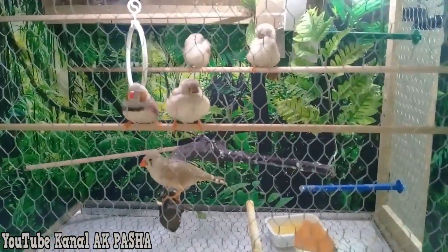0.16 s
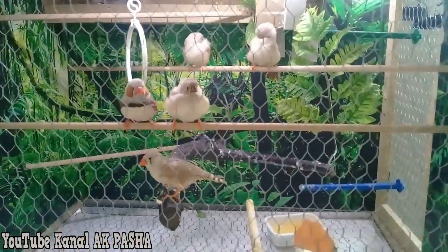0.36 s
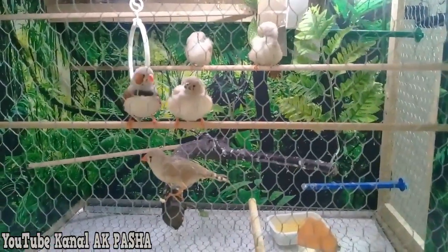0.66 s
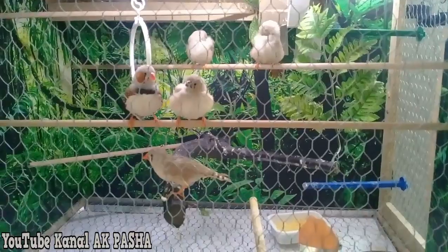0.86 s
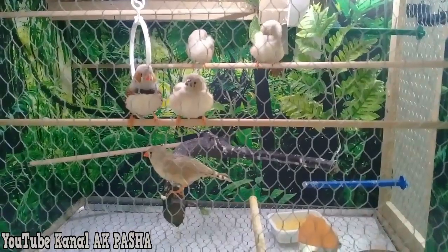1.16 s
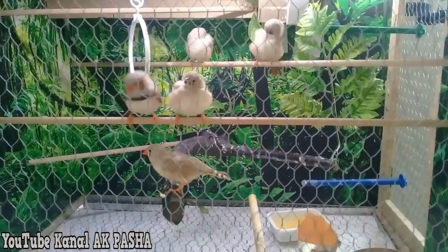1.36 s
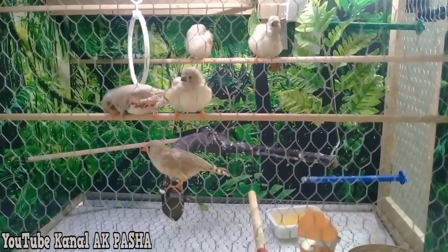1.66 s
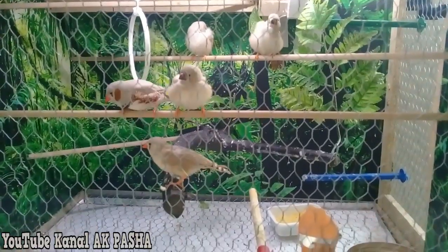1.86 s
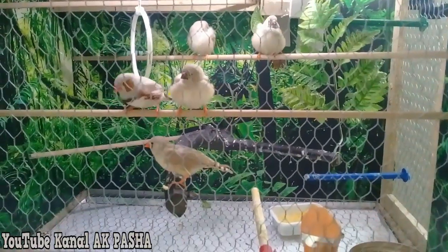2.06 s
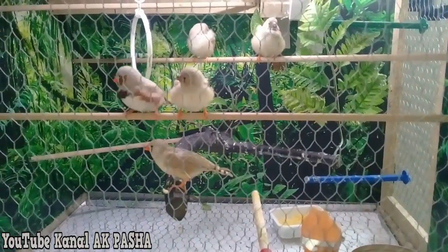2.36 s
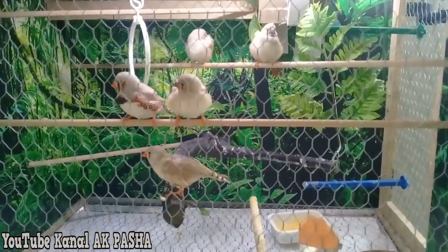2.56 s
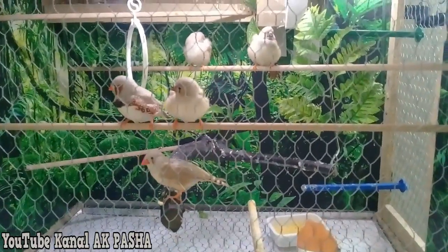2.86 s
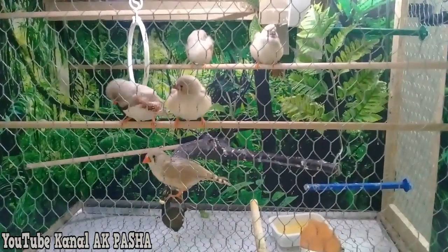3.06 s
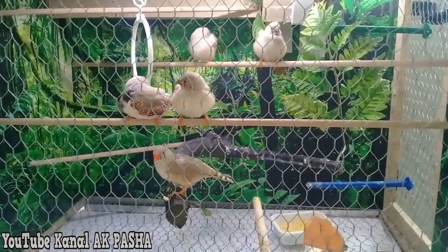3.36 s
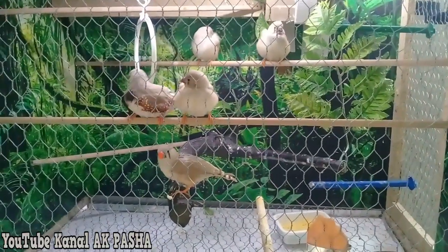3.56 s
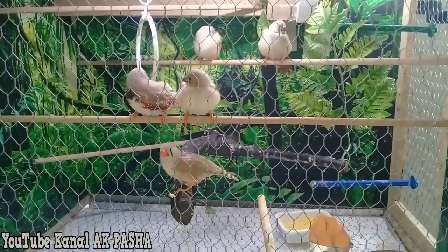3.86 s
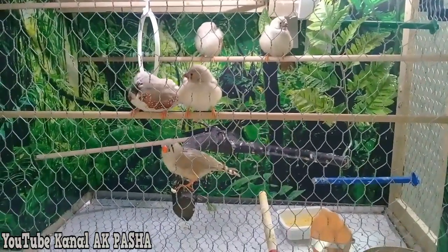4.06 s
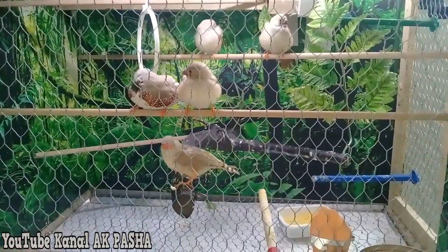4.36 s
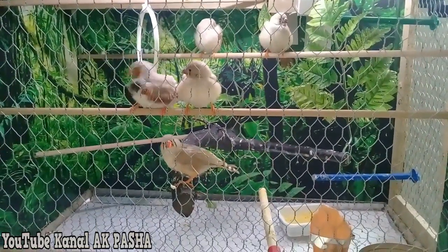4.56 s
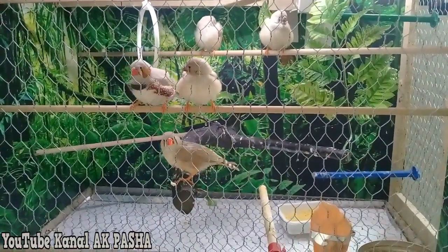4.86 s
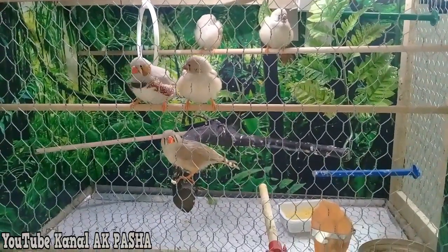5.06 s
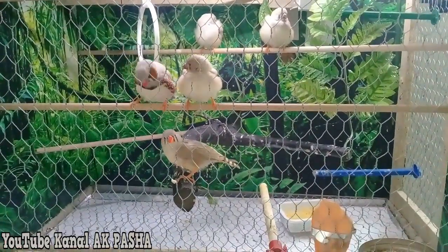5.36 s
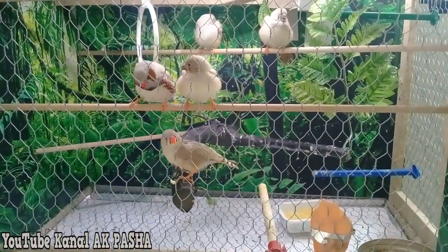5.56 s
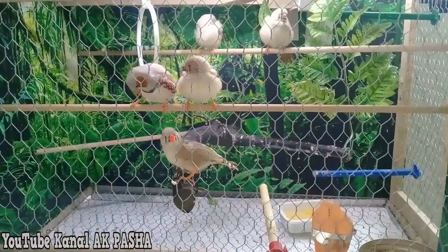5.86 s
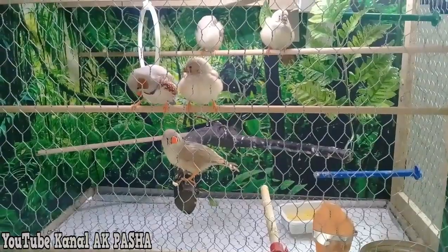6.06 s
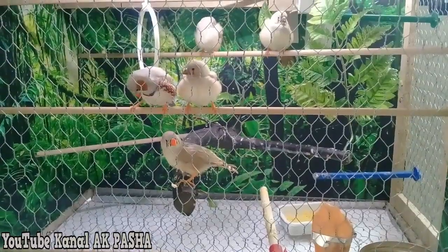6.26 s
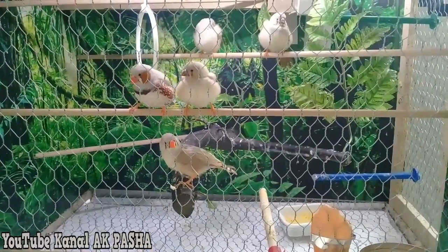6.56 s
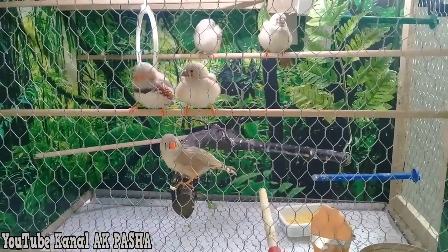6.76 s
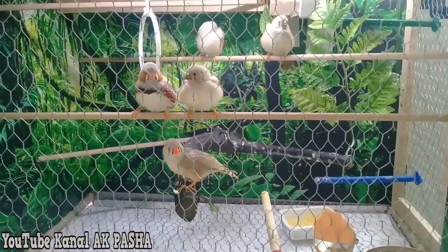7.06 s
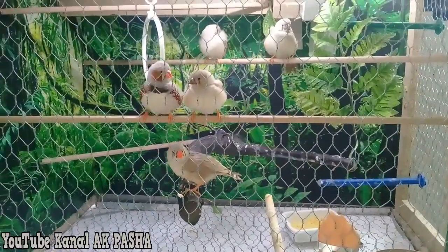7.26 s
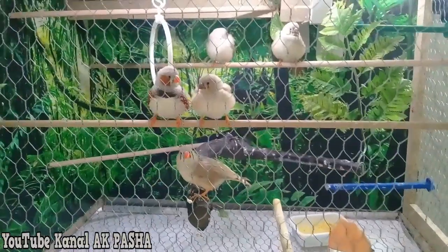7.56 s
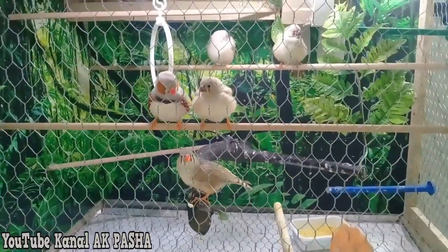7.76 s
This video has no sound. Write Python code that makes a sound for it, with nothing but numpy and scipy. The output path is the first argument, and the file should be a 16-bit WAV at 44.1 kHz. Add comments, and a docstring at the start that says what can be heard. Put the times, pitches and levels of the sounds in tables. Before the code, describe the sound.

Small finches call in a wire cage inside a room, heard a metre or two away on a phone, over quiet low rumble, hum and hiss. At 0 s a tiny whistle and two bright nasal beeps sound with a soft bump, then rough squawks and hoarse calls until 0.7 s. A mellow nasal toot comes at 1.1 s. From 1.5 to 3.1 s quick, broken, mostly falling whistles tumble together with harsh, bright squawks, loudest around 2.4 to 2.7 s. More squawks, a nasal beep and two whistles follow at 3.4 to 3.9 s. Hard dry ticks on perch or wire stand out at 3.6, 4.0 and 4.3 s; lighter ones continue. Between 4 and 5.8 s a young bird whines in thin slides. After a sparse ticking stretch, nasal beeps and chattering whistles return from 6.8 s, with a mellow call at 7.4 s and a faint high whistle ending.

```python
"""Small finches in a wire cage in a room, a metre or two from a phone: low rumble, hum and hiss throughout.
A breathy treble haze (grainy noise band), stepped whistles (near sines) and bright nasal calls (overtone
stacks) open; a soft bump, harsh squawks, hoarse calls (smeared stacks) and mellow nasal calls follow.
From 1.7 s beaks and feet tick on perch and wire (noise-struck modes); from 4 s a young bird whines
(sliding overtones). Whistles and calls return, a thin high whistle ends; the room rings briefly."""
import sys
import numpy as np
from scipy import signal
from scipy.fft import rfft, irfft
from scipy.io import wavfile
from scipy.ndimage import uniform_filter1d

SR = 44100
rng = np.random.default_rng(int(sys.argv[2]) if len(sys.argv) > 2 else 0)


def unload_audio(sound):
    """Save the sound as a 16-bit wav file, at the path given as the first command line argument."""
    columns = np.transpose(np.atleast_2d(sound))
    # keep every value between -1 and 1, then stretch to whole-number steps
    steps = np.round(np.clip(columns, -1, 1) * 32767)
    wavfile.write(sys.argv[1], SR, steps.astype(np.int16))


def voltage_ratio(level):
    """Linear amplitude factor for a level in decibels (scalar or array-like)."""
    return 10 ** (np.asarray(level, float) / 20)


N = 349272
TOP_HZ = 15800


def level(x, rms_db):
    """Scale to an rms level."""
    return x * voltage_ratio(rms_db) / np.sqrt(np.mean(x ** 2))


def shape(points, hz):
    """Spectrum in dB at hz, interpolated on log frequency."""
    point_hz, point_db = np.transpose(points)
    return np.interp(np.log(hz), np.log(point_hz), point_db)


def band(x, hz, width_hz):
    """Resonance, gain 1 at the centre."""
    return signal.lfilter(*signal.iirpeak(min(hz, .45 * SR), hz / width_hz, SR), x)


def band_twice(x, hz, width_hz):
    """Two equal resonances in series: steeper skirts."""
    return band(band(x, hz, width_hz), hz, width_hz)


def walk(rate_hz, size=N):
    """Random levels drawn rate_hz times a second and smoothed; spread near 1."""
    hold = max(int(SR / rate_hz), 2)
    steps = np.repeat(rng.standard_normal(size)[:size // hold + 2], hold)
    return 2.175 * uniform_filter1d(uniform_filter1d(steps, hold), hold)[:size]


def bells(rows):
    """Gain that rises and falls in bell shapes."""
    t = np.arange(N) / SR
    return sum(voltage_ratio(db) * np.exp(-((t - centre_s) / half_width_s) ** 2) for centre_s, half_width_s, db in rows)


def sing(notes, colour, jitter, rough_db, rough_hz, breath_rad, breath_hz, edge_s, count, step_hz=0):
    """Overtones on a wavering pitch, fluttering in strength, soft-edged; breath_rad: phase wander of overtone 4."""
    out = np.zeros(N)
    for note in notes:
        # note points: time_s, pitch_hz, level_db, then any colour control
        point_s, pitch_hz, db, *control = np.transpose(note)
        i = np.arange(int(point_s[0] * SR), min(int(point_s[-1] * SR), N))
        t = i / SR
        db, *control = (np.interp(t, point_s, c) for c in (db, *control))
        # a glide lingers and then drops, step_hz times a second
        stairs_s = np.sin(2 * np.pi * step_hz * (t - point_s[0])) / (2 * np.pi * max(step_hz, 1))
        waver, flutter = (walk(rough_hz, size=SR // 2)[:len(i)] for _ in range(2))
        hz = np.interp(t - stairs_s, point_s, pitch_hz)
        cycles = np.cumsum(hz * (1 + jitter * waver)) / SR
        k = np.arange(1, count + 1)[:, None]
        gains = voltage_ratio(colour(k, k * hz, *control)) * (k * hz < TOP_HZ)
        gains = gains / np.sqrt(np.sum(gains ** 2, 0) / 2)
        own = np.array([walk(breath_hz, size=SR // 3)[:len(i)] for _ in k])
        wander = breath_rad * np.sqrt(k) / 2 * own
        # the throat delays each overtone differently, which spreads the pulse
        spread = 0.11 * k ** 2
        wave = np.sum(gains * np.cos(2 * np.pi * k * cycles + spread + wander), 0)
        edge = np.clip(np.minimum(t - point_s[0], point_s[-1] - t) / edge_s, 0, 1)
        out[i] += wave * voltage_ratio(db + rough_db * flutter) * np.sin(np.pi / 2 * edge) ** 2
    return out


def background():
    """Shaped noise for rumble and hiss, low narrow-band noise of wandering strength, and a wavering hum."""
    # noise spectrum: hz, relative_density_db
    spectrum = [(41, -25.5), (70, -5.5), (169, -12.5), (449, -25.5), (551, -23), (739, -25), (993, -29.5),
                (1110, -25.5), (1220, -26.5), (6090, -39.5), (9360, -40), (15800, -38)]
    # extra gain of the low narrow-band noise: centre_s, half_width_s, level_db
    low_gain = [(1.7, 0.21, -70), (2.35, 0.19, -64), (3.75, 0.2, -66.5), (7.35, 0.095, -70)]
    hz = np.maximum(np.fft.rfftfreq(N, 1 / SR), 1)
    noise = level(irfft(rfft(rng.standard_normal(N)) * voltage_ratio(shape(spectrum, hz)), N), -68.5)
    low = level(band_twice(rng.standard_normal(N), 54.5, 18), 0)
    low = low * (voltage_ratio(-71.5) + bells(low_gain))
    hum = level(band(rng.standard_normal(N), 153, 5.6), -72.5) * voltage_ratio(0.33 * walk(6))
    return noise + low + hum


def treble_haze():
    """Breathy treble haze: a faint grainy noise band near 4.5 kHz that swells, partly around the squawks."""
    # centre_s, half_width_s, level_db
    rows = [(0.0, .2, -60), (1.8, 0.27, -63.5), (2.56, 0.2, -49), (3.0, 0.22, -62), (3.55, 0.16, -48.5),
            (4.3, 0.36, -67), (6.0, .25, -62), (7.1, 0.26, -66), (7.8, .4, -60)]
    grains = rng.standard_normal(N) * voltage_ratio(0.91 * walk(170))
    return level(band_twice(grains, 4500, 1700), 0) * bells(rows)


def whistles():
    """Near sines that slide in broken, fluttering steps, and one thin, steadier high whistle."""
    # song: start_s, length_s, first_hz, last_hz, start_level_db
    rows = [(0.0, .045, 1665, 1586, -47), (1.516, 0.047, 4210, 3640, -50), (1.572, .04, 1580, 2690, -51),
            (1.585, 0.038, 3930, 3620, -53), (1.605, 0.052, 2890, 3400, -50),
            (1.861, 0.022, 3240, 2370, -49.5), (1.893, 0.028, 2310, 2200, -51),
            (1.937, 0.056, 3460, 1240, -47.5), (2.136, 0.035, 3930, 3600, -49.5),
            (2.174, 0.043, 3000, 1700, -48), (2.198, 0.049, 4260, 3270, -54),
            (2.244, .08, 3880, 1480, -44.5), (2.517, 0.068, 3960, 3120, -41),
            (2.544, 0.033, 2105, 1790, -40.5), (2.567, 0.032, 2170, 2270, -45.5),
            (2.733, 0.024, 1923, 1550, -41.5), (2.744, 0.044, 3280, 1730, -49.5),
            (2.766, 0.036, 1890, 1287, -50), (2.804, 0.045, 2060, 2130, -45),
            (2.85, 0.027, 1414, 1203, -50.5), (2.909, .035, 3920, 3610, -50.5),
            (2.95, .035, 2720, 1687, -49.5), (3, 0.015, 2490, 2060, -43), (3.008, 0.034, 3643, 3430, -39),
            (3.036, .058, 3020, 1437, -41.5), (3.714, 0.012, 4030, 4230, -62),
            (3.739, .05, 4060, 1920, -50), (3.793, .09, 3985, 1990, -44), (6.821, 0.04, 2300, 1410, -56),
            (6.876, 0.057, 1348, 1905, -58.5), (6.918, 0.025, 1936, 2616, -49),
            (6.944, 0.031, 2440, 1750, -48.5), (7.17, 0.044, 2277, 1885, -56),
            (7.214, 0.035, 1865, 2555, -48.5), (7.243, 0.038, 2494, 3066, -45.5),
            (7.271, 0.036, 3100, 2010, -43.5), (7.289, 0.042, 2160, 1350, -48),
            (7.605, 0.044, 2860, 1780, -49.5), (7.657, 0.061, 3110, 1864, -47),
            (7.714, 0.027, 1840, 1826, -44), (7.777, 0.123, 1845, 1980, -70.5)]
    # thin whistle, points of each note: time_s, pitch_hz, level_db
    thin = [
        [(7.76, 7050, -76), (7.82, 7230, -72), (7.91, 7150, -78)],
    ]
    # overtones 1-2: relative_db
    overtone_db = [0, -28]
    fade_db = -5.5  # over one note
    notes = [[(s, first_hz, db), (s + length_s, last_hz, db + fade_db)]
             for s, length_s, first_hz, last_hz, db in rows]

    def colour(k, hz):
        return np.array(overtone_db)[:, None] + 0 * hz
    song = sing(notes, colour, jitter=.015, rough_db=3.5, rough_hz=200, breath_rad=.9, breath_hz=600,
                edge_s=.002, count=2, step_hz=55)
    return song + sing(thin, colour, jitter=0.0023, rough_db=0.5, rough_hz=60, breath_rad=.28, breath_hz=99,
                       edge_s=.01, count=2)


def nasal(rows, throat, rule):
    """Clear stacks that scoop up to a top pitch, then sag; the open beak lifts a band."""
    low_s, top_s, sag_hz_per_s, fade_db_per_s, lift_db = rule
    scoop_ratio, scoop_db = .88, -14.5
    notes = []
    for s, length_s, top_hz, db, beak_hz in rows:
        low_hz, after_s = scoop_ratio * top_hz, length_s - top_s
        notes.append([(s, low_hz, db + scoop_db, beak_hz),
                      (s + low_s, low_hz, db + scoop_db / 2, beak_hz),
                      (s + top_s, top_hz, db, beak_hz),
                      (s + length_s, top_hz - sag_hz_per_s * after_s, db - fade_db_per_s * after_s, beak_hz)])

    def colour(k, hz, beak_hz):
        return shape(throat, hz) + lift_db * np.exp(-((hz - beak_hz) / 700) ** 2)
    return sing(notes, colour, jitter=0.0015, rough_db=1.25, rough_hz=207.5, breath_rad=.28, breath_hz=287.0,
                edge_s=0.0046, count=20)


def bright_calls():
    """Nasal calls of a near bird, through a bright throat; they grow after the top pitch."""
    # start_s, length_s, top_hz, level_at_top_db, beak_hz
    rows = [(.01, 0.063, 569, -44, 4600), (.093, 0.0703, 592.4, -39.5, 4080),
            (6.935, 0.061, 561.7, -47, 4750), (7.06, 0.076, 558.7, -43.5, 3900)]
    # hz, relative_db
    throat = [(300, -23), (550, -16.5), (1650, 4.5), (2300, 4.5), (3000, -1), (4500, -7.5), (5600, -3),
              (6900, -27), (14000, -36)]
    # low_until_s, top_reached_s, sag_hz_per_s, fade_db_per_s (negative grows), beak_lift_db
    rule = (.004, 0.0372, 274, -19, 8)
    return nasal(rows, throat, rule)


def bumps():
    """Soft bumps on the frame: dull swells of a low, damped mode."""
    # start_s, length_s, mode_hz, level_before_swell_db
    rows = [(0.037, 0.065, 354, -55.5), (1.7, 0.19, 169, -52)]
    out = np.zeros(N)
    for s, length_s, hz, db in rows:
        i = np.arange(int(s * SR), int((s + length_s) * SR))
        mode = level(band_twice(rng.standard_normal(SR // 4), hz, hz / 2), db)
        out[i] += np.hanning(len(i)) * mode[-len(i):]
    return out


def squawks(rows, breath_rad, count):
    """Turbulent air smears the stack; facing the phone tilts it bright; the beak rings narrowly."""
    # hz, relative_db
    throat = [(450, -15.5), (800, -17), (1150, 1.5), (2500, -7.5), (3500, -8.5), (4100, -6), (6000, -13),
              (6800, -31), (8000, -30), (9500, -38.5), (13600, -36.5), (15800, -52)]
    # effort peaks part of the way through, with most of the pitch change done
    effort_share, pitch_share, start_db, end_db = .6, .8, -5, -3.5
    notes = [[(s, first_hz, db + start_db, tilt),
              (s + effort_share * length_s, first_hz + pitch_share * (last_hz - first_hz), db, tilt),
              (s + length_s, last_hz, db + end_db, tilt)]
             for s, length_s, first_hz, last_hz, db, tilt in rows]

    def colour(k, hz, tilt_db_per_octave):
        tilt_db = tilt_db_per_octave * np.log2(np.minimum(hz, 6500) / 4500)
        beak_db = 2.17 * np.exp(-((hz - 4200) / 350) ** 2)
        return shape(throat, hz) + tilt_db + beak_db
    return sing(notes, colour, jitter=0.0064, rough_db=1.83, rough_hz=255, breath_rad=breath_rad, breath_hz=446,
                edge_s=0.0045, count=count)


def harsh_squawks():
    """Squawks that climb from one common pitch."""
    # start_s, length_s, last_hz, peak_level_db, tilt_db_per_octave
    rows = [(0.193, 0.096, 601.6, -39.5, 5), (0.314, 0.028, 600, -45, 5), (1.744, 0.1, 609.7, -38.5, 7.5),
            (2.323, 0.06, 704, -38.5, 9), (2.42, .07, 726.6, -34, 8.5), (2.578, 0.12, 720, -33.5, 9),
            (3.362, 0.094, 642.5, -37, 8), (3.522, 0.092, 691.7, -33.5, 8.5)]
    first_hz = 516
    return squawks([(s, length_s, first_hz, *rest) for s, length_s, *rest in rows], breath_rad=.55, count=30)


def hoarse_calls():
    """Huskier calls from further back, sagging in pitch, with fewer overtones."""
    # start_s, length_s, first_hz, peak_level_db, tilt_db_per_octave
    rows = [(0.397, 0.044, 519, -46.5, 6), (0.486, 0.12, 678, -47, 6), (0.563, 0.059, 684, -38.5, 9),
            (0.609, 0.08, 598.7, -45, 4.5), (1.203, 0.045, 517, -47.5, 3), (4.518, 0.0604, 830, -53.5, 0.5)]
    sag_ratio = .91
    return squawks([(s, length_s, hz, sag_ratio * hz, *rest) for s, length_s, hz, *rest in rows],
                   breath_rad=.9, count=15)


def mellow_calls():
    """Nasal calls through a mellower throat; they fade after the top pitch."""
    # start_s, length_s, top_hz, level_at_top_db, beak_hz
    rows = [(1.08, .16, 550.7, -39, 2900), (3.465, 0.07, 541, -36, 2220), (4.98, 0.13, 546, -49.5, 2000),
            (7.375, 0.18, 555.2, -36.5, 2780)]
    # hz, relative_db
    throat = [(450, -34), (1150, -21), (1600, -2.5), (2200, 1.5), (2800, -1), (4400, -4), (5000, -14),
              (6600, -31), (14000, -46.5)]
    # low_until_s, top_reached_s, sag_hz_per_s, fade_db_per_s, beak_lift_db
    rule = (0.0149, 0.0361, 280, 23.5, 6)
    return nasal(rows, throat, rule)


def ticks():
    """A burst of contacts rings the damped cage modes; a shorter rod rings higher."""
    # contacts on perch and wire: start_s, peak_db, low_modes_db, rattle_t60_s, pitch_ratio
    rows = [(1.7228, -40.5, -22, 0.011, 1.13), (2.1345, -39, -6, 0.026, 0.77),
            (3.257, -36.5, -9.5, 0.02, 0.84), (3.2786, -38.5, -3, 0.012, 0.8),
            (3.6012, -18, -19, 0.01, 0.97), (4.0003, -20.5, -19, 0.025, 0.95),
            (4.1285, -38, -12, 0.092, 0.88), (4.337, -19.5, -18.5, 0.018, 0.95),
            (4.4243, -45.5, 14, 0.036, 0.9), (4.714, -30.5, -12.5, 0.018, 0.97),
            (4.8482, -39, -7, 0.024, 0.88), (4.8637, -27.5, -14, 0.091, 0.95),
            (5.2641, -40, -6.5, 0.075, 0.8), (5.3028, -40.5, -7, 0.028, 0.94),
            (5.4561, -44.5, -13, 0.084, 0.96), (5.4897, -37, -6.5, 0.049, 0.75),
            (5.9456, -45, 2, 0.03, 1.15), (5.9777, -37, -6, 0.011, 1.15), (6.013, -54, 2, 0.018, 1.12),
            (6.0818, -38, -6.5, 0.02, 1.26), (6.1459, -39, -5, 0.022, 1.18),
            (6.1638, -38.5, -11, 0.034, 0.91), (6.5867, -48, -8.5, 0.089, 1.22),
            (6.8597, -36.5, -8.5, 0.036, 0.97), (7.0035, -34, -11.5, 0.025, 0.95),
            (7.5844, -29.5, -8, 0.019, 0.9)]
    # cage modes at pitch_ratio 1: hz, width_hz (each of two passes), relative_db
    modes = [(1742, 405, 8.5), (2390, 590, 12), (3195, 810, -4), (4274, 870, -1.5), (5280, 640, -1),
             (6540, 1600, -33.5), (9900, 930, -48.5)]
    out, t = np.zeros(N), np.arange(SR // 8) / SR
    for s, peak_db, low_db, rattle_s, pitch_ratio in rows:
        i = int(s * SR)
        rattle = voltage_ratio(0.5) * np.exp(-np.log(1000) * t / rattle_s)
        blow = rng.standard_normal(len(t)) * (np.exp(-t / 0.0013) + rattle)
        ring = sum(voltage_ratio(mode_db + low_db * (hz < 3e3)) * band_twice(blow, pitch_ratio * hz, width_hz)
                   for hz, width_hz, mode_db in modes)
        out[i:i + len(t)] += voltage_ratio(peak_db) * ring / np.max(np.abs(ring))
    return out


def whines():
    """A young bird's slow sliding tone; pushed higher it loses its overtones."""
    # points of each whine: time_s, pitch_hz, level_db
    notes = [
        [(3.96, 590, -85), (4.0, 581, -66), (4.034, 567, -70), (4.09, 574, -85)],
        [(4.17, 1050, -50), (4.218, 1013, -54), (4.232, 1122, -53), (4.33, 1124, -79)],
        [(4.425, 700, -73), (4.5, 703, -82), (4.565, 842, -66), (4.6, 694, -64.5), (4.71, 752, -75)],
        [(4.87, 1104, -43), (4.95, 1154, -52), (4.99, 998, -51.5), (5.02, 1090, -50.5), (5.1, 1267, -51.5),
         (5.18, 1190, -76)],
        [(5.49, 1170, -62), (5.516, 1104, -52.5), (5.596, 1067, -53), (5.62, 1167, -54.5), (5.716, 1379, -48.5),
         (5.78, 1360, -96)],
    ]
    # overtones 1-7: relative_db
    overtone_db = [3.5, 5.5, -4.5, -6.5, -8, -28.5, -30]
    pure_above_hz, purer_db_per_hz = 1130, 0.13

    def colour(k, hz):
        excess_hz = np.maximum(hz[0] - pure_above_hz, 0)
        return np.array(overtone_db)[:, None] - purer_db_per_hz * excess_hz * (k - 1)
    return sing(notes, colour, jitter=0.012, rough_db=3.0, rough_hz=67.8, breath_rad=.7, breath_hz=204.0,
                edge_s=0.0038, count=7)


def room(x):
    """Dense echoes that start after the nearest wall; the treble dies soonest."""
    # band_hz, t60_s
    decays = [(700, 0.26), (2500, 0.31), (5000, 0.18)]
    t = np.arange(SR // 2) / SR
    tail = sum(band(rng.standard_normal(len(t)), hz, 0.8 * hz) / np.sqrt(hz) * np.exp(-np.log(1000) * t / t60_s)
               for hz, t60_s in decays)
    tail = tail * np.clip((t - .002) / 0.0039, 0, 1)
    # a gentle low-pass above about 6 kHz on the echoes
    tail = signal.sosfilt(signal.butter(N=2, Wn=6200, fs=SR, output="sos"), tail)
    return signal.fftconvolve(x, tail / np.sqrt(np.sum(tail ** 2)))[:N]


def scene():
    """Birds and ticks each send their own share to the room; bumps, background and haze stay dry."""
    song, calls = whistles(), bright_calls() + mellow_calls()
    harsh, hoarse = harsh_squawks(), hoarse_calls()
    taps, young = ticks(), whines()
    wet = voltage_ratio(-7.0) * song + voltage_ratio(-9.0) * calls + voltage_ratio(-7.5) * harsh
    wet = wet + voltage_ratio(-5.0) * hoarse + voltage_ratio(-1.0) * taps + voltage_ratio(-6.5) * young
    direct = song + calls + harsh + hoarse + taps + young
    return (direct + room(wet) + background() + treble_haze() + bumps())[None]


def band_limit(x):
    """A steep low-pass at the top of the band."""
    return signal.sosfilt(signal.butter(12, 15920, fs=SR, output="sos"), x)


def record(dry):
    """The phone cuts the top with a steep low-pass."""
    low_pass = signal.ellip(8, .2, 70, TOP_HZ, fs=SR, output="sos")
    return band_limit(signal.sosfilt(low_pass, dry))


dry = scene()
out = record(dry)
unload_audio(out)
```